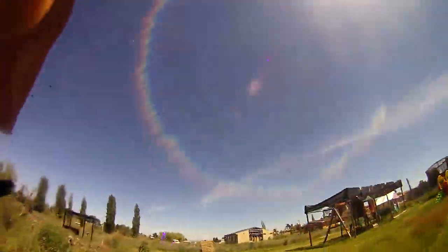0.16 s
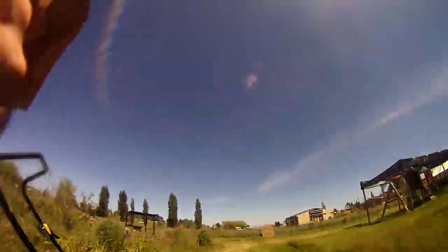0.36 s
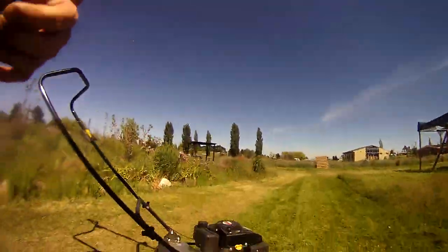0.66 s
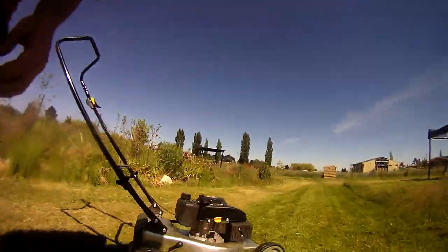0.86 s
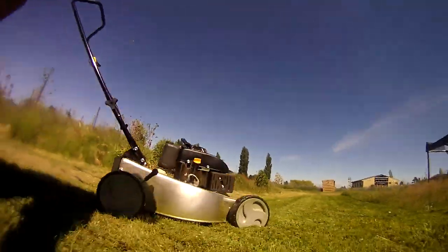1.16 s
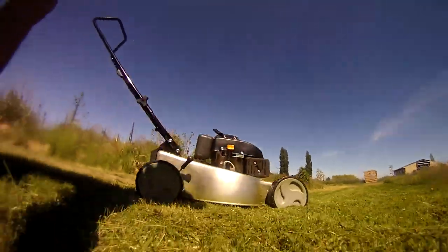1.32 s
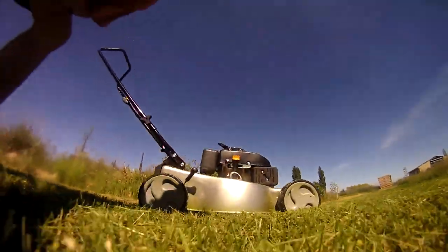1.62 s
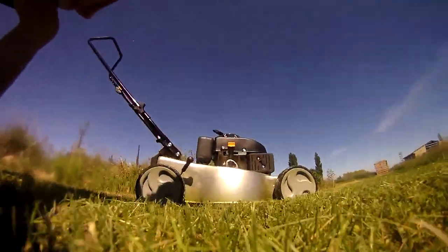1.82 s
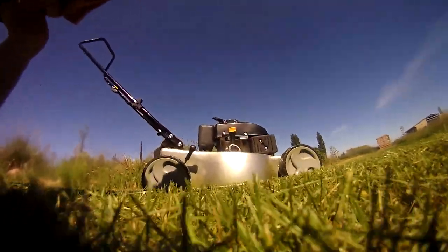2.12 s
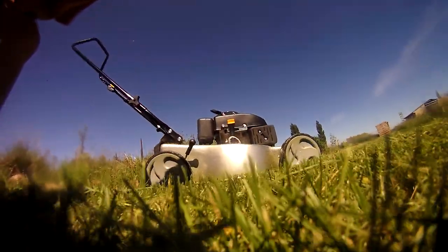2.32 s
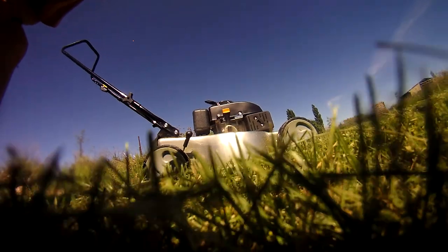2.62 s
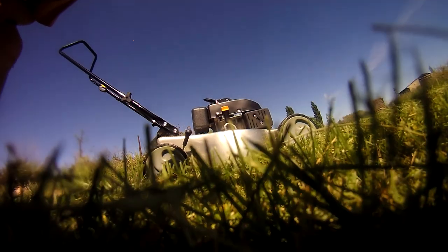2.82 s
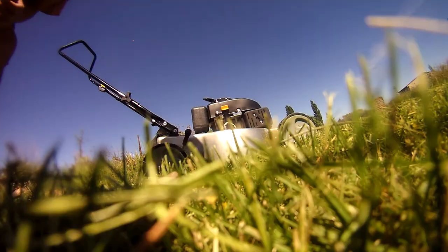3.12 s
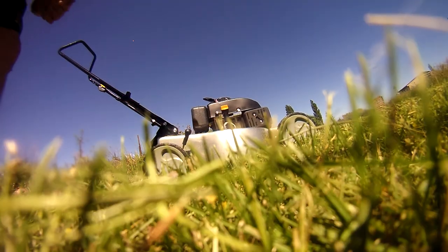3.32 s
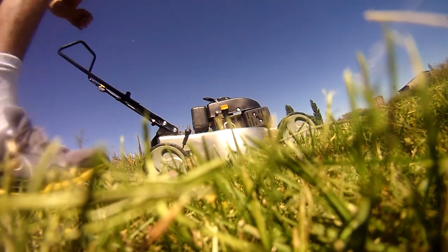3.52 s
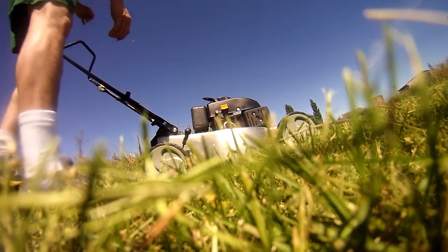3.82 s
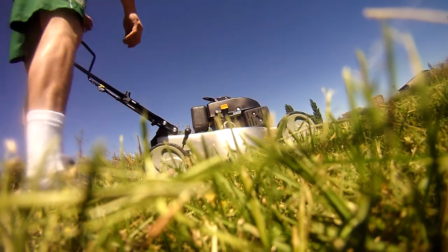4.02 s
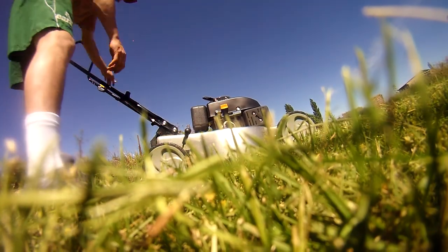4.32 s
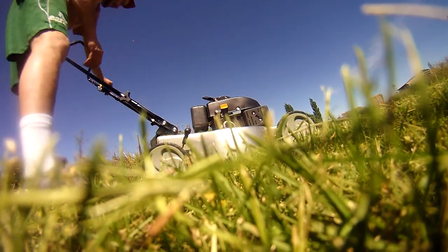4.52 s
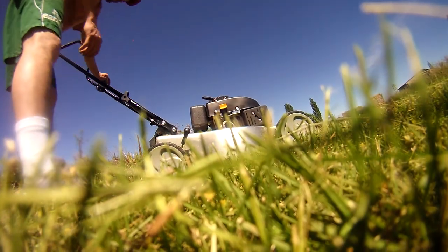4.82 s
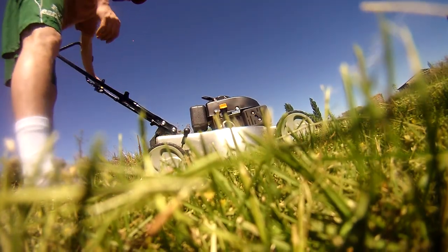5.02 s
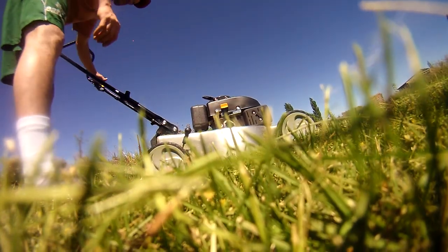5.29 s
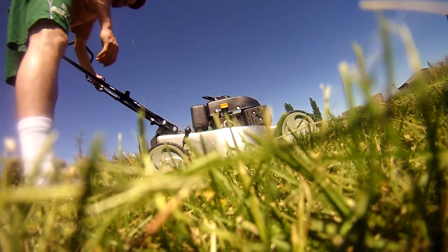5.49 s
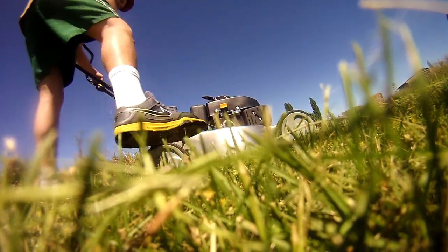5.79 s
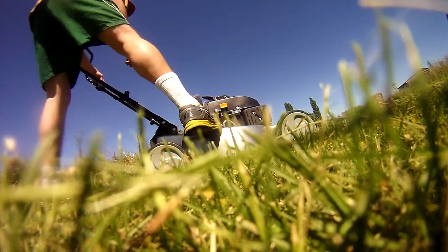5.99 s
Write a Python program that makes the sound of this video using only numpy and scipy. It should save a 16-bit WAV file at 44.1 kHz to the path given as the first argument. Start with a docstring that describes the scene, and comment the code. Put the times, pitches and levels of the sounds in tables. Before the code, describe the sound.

Everything is heard from inside a sealed plastic housing: close, boxy, midrange-heavy and short of treble, outdoors with a very faint breeze and distant field noise. From 0 to 0.5 s fingers slide on the shell in short fine scrapes, with dull low sway. Light fingertip taps and small rubs follow until 1.5 s, clustering around 1.1 and 1.4 s. At 1.5 s the camera hits the grass: very loud, clipped thumps and a brief rattle until about 1.6 s, with coarse turf scraping. From 1.6 to 2.6 s it is twisted into place, with uneven gritty drags, deep bumps and hard plastic clicks, heavy jolts around 2.0-2.1 s and a sharp knock near 2.6 s. Smaller knocks and snaps thin out by 3.1 s. To the end at about 6 s, only sparse, tiny ticks and faint creeping grass crackle remain over soft hiss.

```python
"""A small camera in a sealed plastic housing is swung by hand, lands hard in grass, is twisted into place and left lying.
Sway and jolts push the microphone directly and overload it, over a faint bed of breeze and distant field noise.
Fingers and turf scrape the shell by stick-slip; fingertips tap it and blades snap against it, and bent grass creeps back.
The shell rings in a few modes and shuts out most of the treble."""
import sys
import numpy as np
from scipy import signal
from scipy.fft import rfft, irfft
from scipy.io import wavfile

SR = 44100
rng = np.random.default_rng(int(sys.argv[2]) if len(sys.argv) > 2 else 0)


def transcribe(signal):
    """Save signal, clipped to [-1, 1], as a 16-bit WAV file at the path in sys.argv[1]."""
    frames = np.atleast_2d(signal).T
    limited = np.clip(frames, -1, 1)
    pcm = np.round(limited * 32767).astype(np.int16)
    wavfile.write(sys.argv[1], SR, pcm)


N = 271215

# Ringing modes of the plastic shell. Each row: centre in Hz, width of each of two passes in Hz, level in dB.
SHELL = [(590, 500, -4), (954, 560, -5), (1390, 550, -1.5), (1700, 790, -0.5), (2175, 650, 0.5),
         (2613.6, 350, -2), (2960, 790, 3.5), (4453, 540, -24)]


def undb(db):
    """Amplitude gain of a level in dB."""
    return 10 ** (np.asarray(db) / 20)


def unit(x):
    """Scale to rms 1."""
    return x / np.sqrt(np.mean(x ** 2))


def cut(x, hz, kind, order=2):
    """Butterworth low- or high-pass."""
    return signal.sosfilt(signal.butter(order, hz, kind, fs=SR, output="sos"), x)


def ring(x, hz, width_hz):
    """One resonance, passed twice for steep skirts, gain 1 at its centre."""
    b, a = signal.iirpeak(hz, hz / width_hz, SR)
    once = signal.lfilter(b, a, x)
    return signal.lfilter(b, a, once)


def shell(strikes):
    """Each mode rings to its own strike signal; a dry click passes between them; the walls stop the treble."""
    edge_hz, dry_db = 3240, -5.0
    modes = sum(undb(db) * ring(x, hz, width_hz) for x, (hz, width_hz, db) in zip(strikes[:-1], SHELL))
    click = undb(dry_db) * cut(np.mean(strikes, axis=0), 1400, "high")
    hz, width_hz, db = SHELL[-1]  # the top mode lies above the wall cutoff
    top_mode = undb(db) * ring(strikes[-1], hz, width_hz)
    return cut(modes + click, edge_hz, "low", order=6) + top_mode


def slips(rate_hz, spread_db):
    """Random stick-slip clicks of both signs; exponential spread in dB makes a few much larger."""
    happens, sign, size = rng.random((N, 3)).T
    size_db = spread_db * np.minimum(-np.log(1 - size), 3)
    return (happens < rate_hz / SR) * np.sign(sign - .5) * undb(size_db)


def flicker(rate_hz, rms_db):
    """Gain wandering in dB as low-passed noise."""
    return undb(rms_db * unit(cut(rng.standard_normal(N), rate_hz, "low")))


def friction(rate_hz, spread_db, own, crackle_db):
    """Slips shared by all modes plus slips felt by one mode; returns the scrape and the thud under it."""
    common = slips(rate_hz, spread_db) * flicker(40, 4.9)
    scrape = shell([common + own * slips(rate_hz, spread_db) * flicker(46, 4.0) for _ in SHELL])
    crackle = cut(cut(common, 3600, "high"), 5500, "low", order=3)
    steps = cut(common, 160, "low", order=1)  # each slip steps the diaphragm
    thud = cut(cut(steps, 110, "high"), 1200, "low")
    return unit(scrape) + undb(crackle_db) * unit(crackle), unit(thud)


def swells(starts_s, held_ms, top_db, rise_db_s, fall_db_s):
    """Summed gains of gestures that rise, hold and fall, linearly in dB."""
    t = np.arange(N) / SR
    gain = 0
    for start, ms, top, rise in np.broadcast(starts_s, held_ms, top_db, rise_db_s):
        before = np.maximum(start - t, 0)
        after = np.maximum(t - start - ms / 1000, 0)
        gain = gain + undb(top - rise * before - fall_db_s * after)
    return gain


def leak(x):
    """The narrow treble band around 4800 Hz that gets through the walls."""
    return cut(cut(x, 4800, "high", order=3), 4800, "low", order=5)


def snaps(rows, tail_ms, octaves, stray, grit):
    """Clicks with a short scraping tail strike mostly the modes near their own pitch and leak some treble."""
    strikes, edge = np.zeros((len(SHELL), N + SR)), np.zeros(N + SR)
    t_ms, modes_hz = np.arange(SR // 20) / SR * 1000, np.array(SHELL)[:, 0]
    chance = rng.random((len(rows), len(SHELL)))
    noise = rng.standard_normal((len(rows), len(t_ms)))
    click = 1. * (t_ms == 0)
    click_treble = np.std(leak(click)[t_ms < 2])  # treble level is taken over 2 ms
    for (s, peak_db, hz, treble_db), c, g in zip(rows, chance, noise):
        share = np.exp(-(np.log2(modes_hz / hz) / octaves) ** 2) + stray * c
        blow = grit * g * np.exp(-t_ms / tail_ms)
        blow[0] = 1
        click_peak = np.abs(shell(np.outer(share, click))).max()
        start = int(s * SR)
        span = slice(start, start + len(t_ms))
        strikes[:, span] += undb(peak_db) * np.outer(share, blow) / click_peak
        edge[span] += undb(peak_db + treble_db) * blow / click_treble
    return shell(strikes[:, :N]) + leak(edge[:N])


def sway():
    """The hand rocks the housing: slow pressure swings inside it, as noise between 4.7 and 19 Hz."""
    # Each row: time in seconds, rms level in dB.
    rocking = [(0, -40), (.1, -45), (.24, -31.5), (.33, -45.5), (.5, -42.5), (.6, -39), (.8, -39.5),
               (.93, -49), (1.1, -39), (1.45, -39.5), (1.5, -39.5), (1.61, -46), (1.64, -19), (2.0, -26),
               (2.55, -20), (2.7, -36), (3.1, -45), (3.5, -73)]
    s, level_db = np.transpose(rocking)
    db = np.interp(np.arange(N) / SR, s, level_db)
    swing = cut(cut(rng.standard_normal(N), 19, "low"), 4.7, "high")
    return undb(db) * unit(swing)


def air():
    """Breeze and distant field noise, shaped on a log-frequency axis; the breeze makes the bass gust."""
    # Background spectrum. Each row: frequency in Hz, relative level in dB per Hz.
    spectrum = [(12, -30.5), (20, 2.5), (57, 6), (197, -14), (1130, -28), (1290, -42), (2440, -34.5),
                (2990, -30.5), (3670, -40), (4500, -48.5), (5850, -72.5), (9900, -120)]
    level_db = -57.5
    points_hz, points_db = np.transpose(spectrum)
    hz = np.arange(N // 2 + 1) * SR / N + 1  # +1 keeps the log finite
    db = np.interp(np.log(hz), np.log(points_hz), points_db)
    even = undb(level_db) * unit(irfft(rfft(rng.standard_normal(N)) * undb(db), N))
    bass = cut(even, 400, "low", order=1)
    return even + bass * (flicker(31, 0.77) - 1)


def fingers():
    """Skin sliding on the shell: a dense, fine stick-slip scrape whose colour moves with the grip."""
    # Each row: full from in seconds, held in ms, low scrape in dB, high scrape in dB, thud in dB.
    slides = [(0.01, 126, -49, -50.5, -56.5), (0.169, 212, -58.5, -59, -63), (0.213, 29.5, -44.5, -51, -48),
              (0.39, 850, -88, -81.5, -81), (0.438, 66, -64.5, -74, -86), (0.57, 70, -68, -67, -79),
              (0.699, 40, -55, -69, -72), (0.752, 60, -67, -77, -70), (0.87, 124, -72, -76, -77),
              (1.06, 70, -57, -64, -63.5), (1.145, 84, -67, -72.5, -82), (1.336, 34, -62.5, -75, -68),
              (1.415, 21, -50.5, -57.5, -92), (1.464, 8, -49, -45.5, -60), (1.488, 13, -44, -43.5, -67.5)]
    rise_db_s, fall_db_s = 1197.5, 797
    s, ms, *levels_db = np.transpose(slides)
    scrape, thud = friction(4000, 3.5, 1.1, -29.0)
    low = ring(scrape, 1300, 1150)  # the grip damps the modes between low and high
    high = ring(scrape, 2400, 2200) + cut(scrape, 4000, "high", order=3)
    return sum(swells(s, ms, db, rise_db_s, fall_db_s) * unit(x)
               for db, x in zip(levels_db, (low, high, thud)))


def taps():
    """Fingertips tap the shell: snaps with long scraping tails on a narrow range of modes."""
    # Each row: start in seconds, click peak in dB, strongest mode in Hz, treble against the peak in dB.
    tap_rows = [(0.43, -32.5, 1700, -48), (0.615, -40, 1440, -38), (0.756, -40.5, 1450, -36),
                (1.06, -51, 970, -40), (1.094, -30, 1450, -66), (1.338, -38.5, 1540, -57),
                (1.369, -42, 1330, -50), (1.38, -38.5, 994, -57), (1.408, -37, 1310, -51)]
    return snaps(tap_rows, tail_ms=5, octaves=.3, stray=.05, grit=0.093)


def jolts():
    """Diaphragm pushes that build up and ease off; each new jolt takes over from the last."""
    # Each row: start in seconds, drive in dB, direction, rise time constant in ms, Gaussian length in ms.
    pushes = [(0.6174, -33, -1, 0.18, 8.9), (1.5052, 5, -1, 0.17, 15), (1.5092, 0, -1, 0.15, 9.1),
              (1.5235, 6, 1, 0.14, 51), (1.5308, 6.5, -1, 0.28, 11), (1.5328, 3.5, 1, 0.26, 5.1),
              (1.560, -3, 1, 1.8, 3.6), (1.569, -1.5, 1, 1.3, 60), (1.5765, 11, -1, 0.24, 13.1),
              (1.594, -6, 1, 0.72, 7.5), (1.630, -7.5, -1, 1.4, 99), (1.6789, -3.5, 1, 1.35, 3.7),
              (1.714, -23, 1, 0.71, 25), (1.8062, -3, 1, 2, 5.1), (1.8212, -7.5, -1, 0.1, 5.4),
              (2, -3, -1, 4.7, 25), (2.015, -2, 1, 10, 25.5), (2.036, -2.5, -1, 0.73, 1.26),
              (2.0377, -7, 1, 5, 30), (2.103, -2, -1, 1.7, 5.3), (2.127, 2, 1, 14.6, 20.5),
              (2.2527, -9.5, -1, 0.16, 11.5), (2.27, -7, 1, 0.89, 11.4), (2.481, -11.5, -1, 1.9, 27),
              (2.5921, -1.5, 1, 0.068, 4), (2.7277, -26, 1, 0.088, 6.6), (2.746, -26.5, 1, 0.11, 1.9),
              (2.7976, -15, 1, 0.12, 5.4), (2.83, -40, 1, .4, 2.6), (3.075, -22, -1, 2.2, 3.2),
              (3.296, -29.5, -1, 2.15, 4.5), (3.4653, -38.5, 1, 0.33, 8.7), (3.907, -35.5, 1, 2.2, 7.5),
              (3.999, -38.5, 1, 0.39, 10), (4.2876, -34.5, 1, 0.47, 6.3), (4.554, -31, 1, 6.6, 17),
              (4.805, -37.5, -1, 1.2, 7.8), (5.229, -39.5, -1, 0.37, 3.43), (5.426, -42, -1, 0.33, 3.8),
              (5.545, -38, -1, 0.16, 7.4)]
    out, t_ms = np.zeros(N + SR), np.arange(SR // 10) / SR * 1000
    for s, db, way, rise_ms, length_ms in pushes:
        i = int(s * SR)
        fade = np.exp(-t_ms / rise_ms)
        push = np.sign(way) * undb(db) * (1 - fade) * np.exp(-(t_ms / length_ms) ** 2)
        out[i:i + len(t_ms)] = out[i - 1] * fade + push
    blocked = cut(out[:N], 3.3, "high", order=1)
    return cut(blocked, 3100, "low", order=1)  # the rubber mount softens the edge


def rattle():
    """Loose parts buzz briefly at two knocks: band noise with an abrupt fade."""
    # Each row: start in seconds, length in ms, level in dB, centre in Hz.
    buzzes = [(1.5243, 7.8, 11, 800.5), (2.592, 1.4, -15.5, 2897)]
    out, noise = 0, rng.standard_normal(N)
    for s, ms, db, hz in buzzes:
        t = np.arange(N) / SR - s
        buzz = cut(cut(noise, hz * 2, "low", order=3), hz / 2, "high", order=1)
        fade = (t > 0) * np.exp(-(1000 * t / ms) ** 4)
        out = out + undb(db) * fade * unit(buzz)
    return out


def rub():
    """Turf drags over the shell in coarse grains as it lands and is twisted; hard strokes sizzle through the walls."""
    # Each row: full from in seconds, held in ms, scrape in dB, thud in dB, rise in dB/s.
    strokes = [(1.538, 22, -25.5, -17, 1501), (1.612, 72, -29, -27, 1500), (1.719, 40, -49.5, -44, 501),
               (1.812, 38, -29, -24, 330), (1.875, 35, -46.5, -43, 498.5),
               (1.974, 59.6, -32.5, -27.5, 395.5), (2.091, 43, -32.5, -26, 448),
               (2.207, 64.4, -39.5, -33, 1202), (2.317, 123, -49, -50, 497),
               (2.524, 104, -35.5, -32.5, 221.5)]
    fall_db_s, sizzle_db, sizzle_power = 500, -43, 1.7  # sizzle level is that of the hardest stroke
    s, ms, scrape_db, thud_db, rise_db_s = np.transpose(strokes)
    scrape, thud = friction(1500, 4.9, 1.0, -34.5)
    drag = swells(s, ms, scrape_db, rise_db_s, fall_db_s)
    weight = swells(s, ms, thud_db, rise_db_s, fall_db_s)
    sizzle = unit(cut(cut(slips(3000, 4.3), 2700, "high"), 3400, "low", order=3))
    sizzle_gain = undb(sizzle_db) * (drag / drag.max()) ** sizzle_power  # grows faster than the scrape
    return drag * scrape + weight * thud + sizzle_gain * sizzle


def ticks():
    """Grass blades snap against the shell: very short snaps spread over more modes."""
    # Each row: start in seconds, click peak in dB, strongest mode in Hz, treble against the peak in dB.
    tick_rows = [(1.593, -18.5, 802, -18), (1.612, -28, 1130, -31), (1.627, -11.5, 2580, -31),
                 (1.679, -13, 2820, -40), (1.734, -42, 2520, -28), (1.787, -17.5, 1300, -34),
                 (1.805, -12.5, 3000, -44.5), (1.894, -14, 2620, -36), (1.963, -23.5, 2630, -38),
                 (2.062, -22, 1450, -48), (2.092, -29, 851, -35), (2.203, -40, 1210, -27),
                 (2.215, -23.5, 966, -45), (2.24, -15.5, 795, -55), (2.27, -18, 1560, -42),
                 (2.328, -38, 856, -25), (2.449, -32, 2840, -30.5), (2.627, -44.5, 2710, -32.5),
                 (2.687, -27, 872, -29), (2.703, -27.5, 2590, -40), (2.727, -23, 2270, -52),
                 (2.747, -26.5, 2860, -50), (2.827, -28.5, 855, -48), (2.842, -25.5, 2860, -44.5),
                 (2.908, -32, 2160, -27), (2.933, -35, 1360, -34), (2.96, -32, 2680, -44),
                 (2.998, -44, 2840, -29.5), (3.029, -40, 1340, -37), (3.056, -40.5, 2640, -33),
                 (3.101, -42, 1446, -37), (3.232, -49.5, 2990, -25.5), (3.264, -38.5, 3020, -30.5),
                 (3.343, -39, 2880, -30), (3.422, -43.5, 2786, -36), (3.465, -44, 1350, -29),
                 (3.492, -44.5, 3040, -22), (3.654, -49.5, 3090, -32), (3.67, -46.5, 1900, -28.5),
                 (3.739, -33, 2090, -39), (3.811, -43.5, 880, -43), (3.907, -49.5, 1380, -25.5),
                 (4.002, -40, 1365, -35), (4.096, -54, 1326, -34), (4.173, -46, 3073, -24),
                 (4.288, -32, 3000, -32.5), (4.313, -51.5, 2920, -35), (4.429, -45.5, 1760, -21),
                 (4.477, -49, 3035, -29), (4.507, -40.5, 2947, -30), (4.803, -46, 1350, -27.5),
                 (4.886, -43, 1975, -36.5), (5.053, -45.5, 3090, -25.5), (5.228, -47, 2435, -18),
                 (5.426, -39, 1390, -38), (5.472, -44, 2930, -36), (5.544, -46.5, 3030, -28.5),
                 (5.658, -52.5, 2950, -26), (5.717, -54, 2913, -31.5), (5.759, -52, 2985, -29),
                 (5.792, -44.5, 2046, -32.5), (5.91, -49, 2070, -33)]
    return snaps(tick_rows, tail_ms=0.67, octaves=0.62, stray=0.41, grit=.04)


def settle():
    """Bent blades spring back in a fading rustle, then creep one by one and in bunches: a sparse crackle."""
    # Blades slipping together. Each row: middle in seconds, length in ms, level in dB.
    bunches = [(3.23, 11.8, -63.5), (3.562, 26, -67), (3.691, 73, -65.5), (3.82, 22, -66),
               (4.178, 23, -63.5), (4.25, 36, -63.5), (4.431, 26, -62), (4.501, 28.6, -65), (4.78, 57, -71),
               (5.062, 63, -67.5), (5.221, 24.5, -67), (5.44, 21.4, -56.5), (5.491, 34.4, -63.5),
               (5.681, 54, -68), (5.981, 24, -72.5)]
    let_go_s = 2.66
    settle_db, settle_fall_db_s = -51, 41
    creep_db, creep_fall_db_s = -65.5, 3.5
    t = np.arange(N) / SR
    since = np.maximum(t - let_go_s, 0)
    rustle, rumble = friction(350, 5.8, 0.49, -37.5)
    scrape, thud = friction(120, 5.9, 0.66, -33)
    dense = (t > let_go_s) * undb(settle_db - settle_fall_db_s * since)
    sparse = (t > let_go_s) * undb(creep_db - creep_fall_db_s * since) * flicker(6.3, 2.4)
    for s, ms, top_db in bunches:
        sparse = sparse + undb(top_db) * np.exp(-((t - s) * 2000 / ms) ** 4)
    return dense * (rustle + undb(1.5) * rumble) + sparse * (scrape + undb(-2.5) * thud)


def scene():
    """Everything reaches one microphone."""
    handling = sway() + fingers() + taps()
    landing = jolts() + rattle() + rub() + ticks()
    return (handling + landing + settle() + air())[None]


def record(dry):
    """The preamp clips hard and rounds the edges; a capacitor blocks the offset; the converter hisses; the top is cut."""
    clip_down, clip_up = -0.75, 0.65
    hiss_db, top_hz = -80.5, 16000
    clipped = np.clip(dry, clip_down, clip_up)
    blocked = cut(clipped, 1, "high", order=1)
    rounded = cut(blocked, 12000, "low", order=1)
    hiss = undb(hiss_db) * rng.standard_normal(N)
    top_cut = signal.ellip(10, .2, 80, top_hz, fs=SR, output="sos")
    return signal.sosfilt(top_cut, rounded + hiss)


dry = scene()
out = record(dry)
transcribe(out)
```